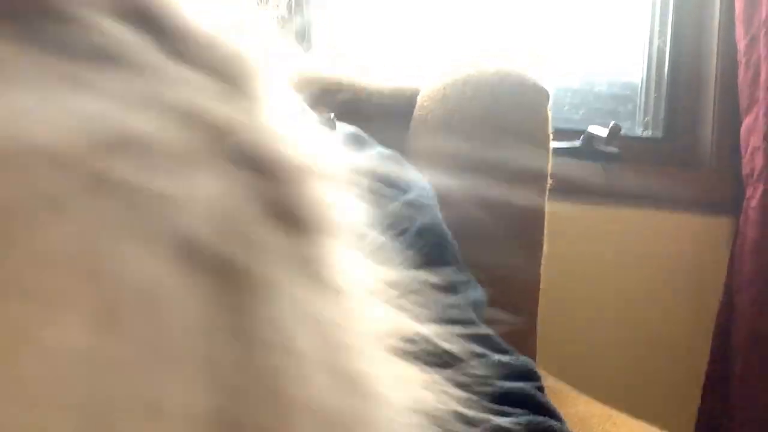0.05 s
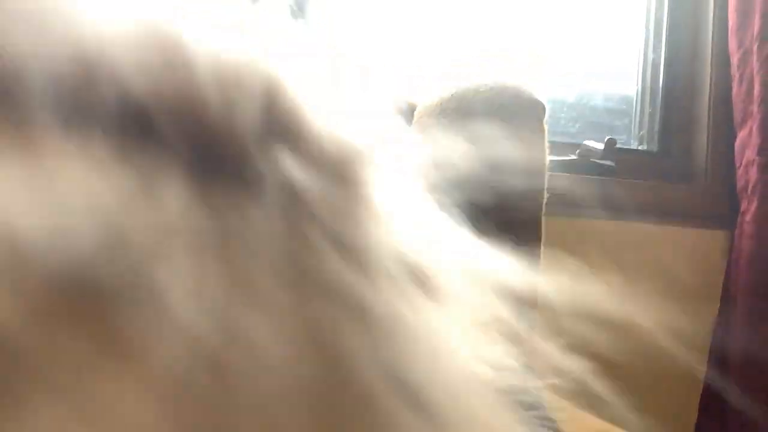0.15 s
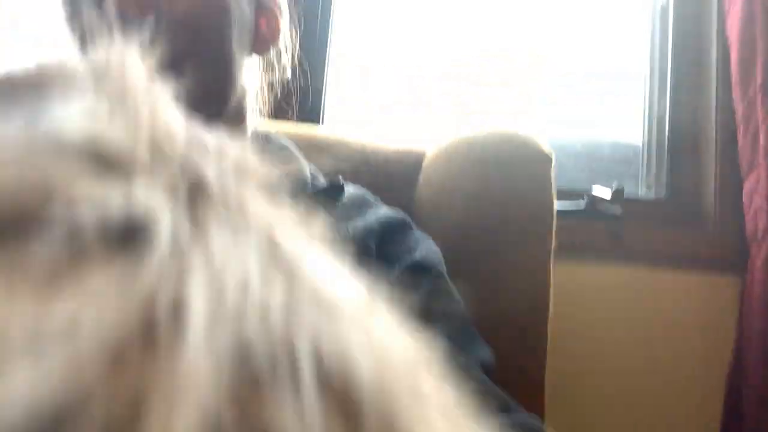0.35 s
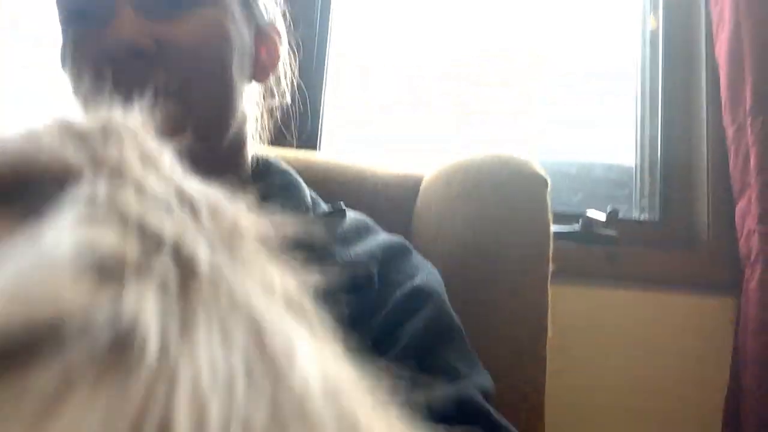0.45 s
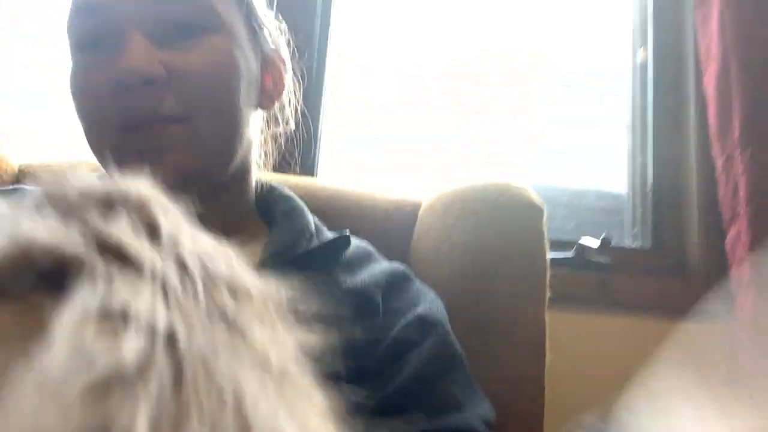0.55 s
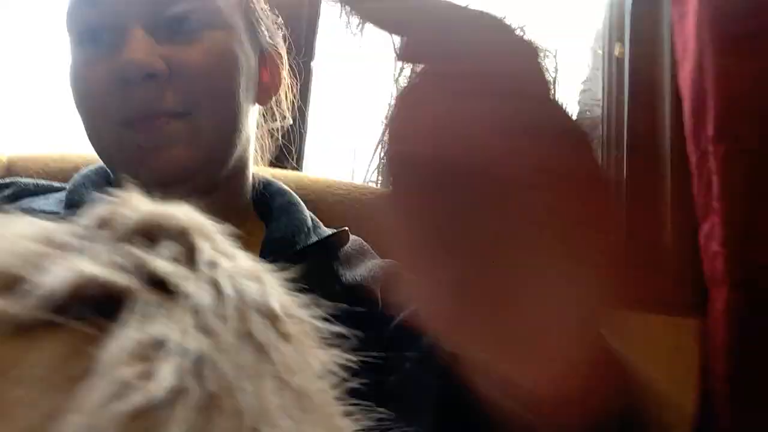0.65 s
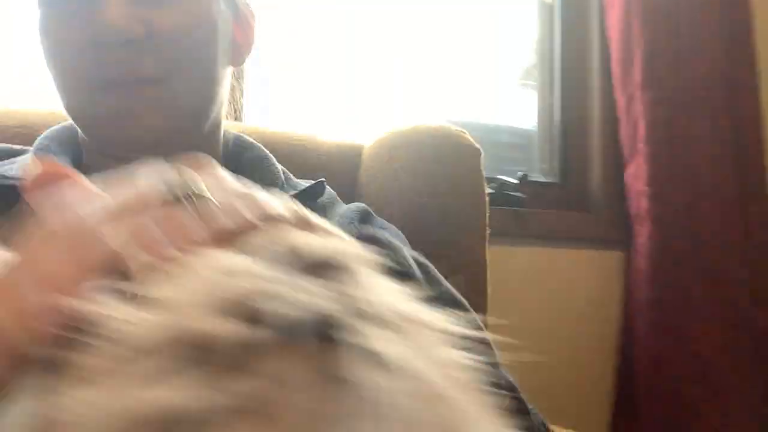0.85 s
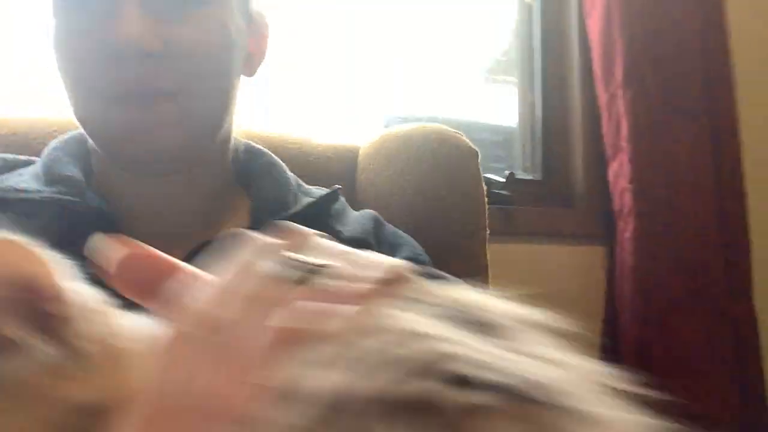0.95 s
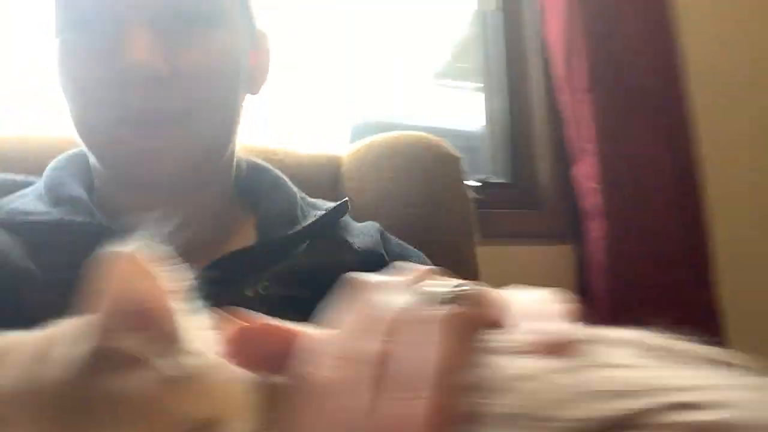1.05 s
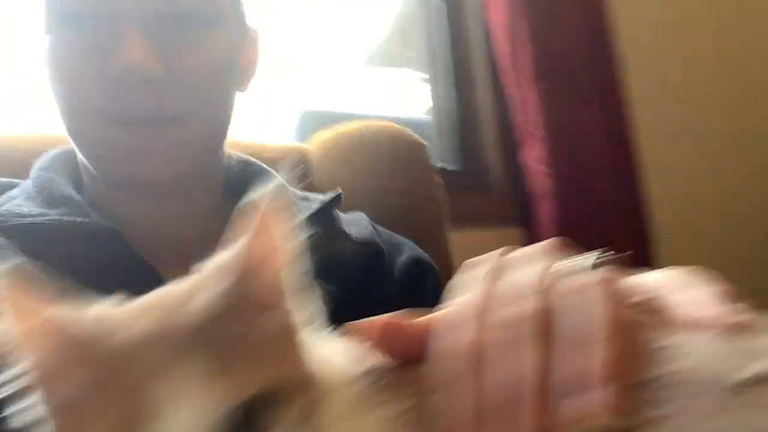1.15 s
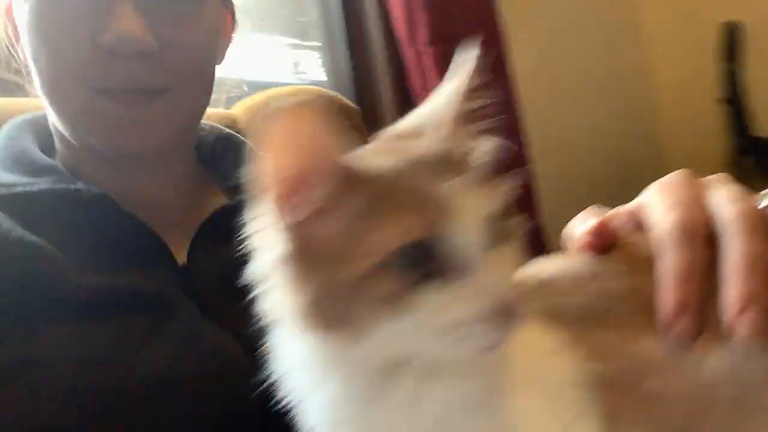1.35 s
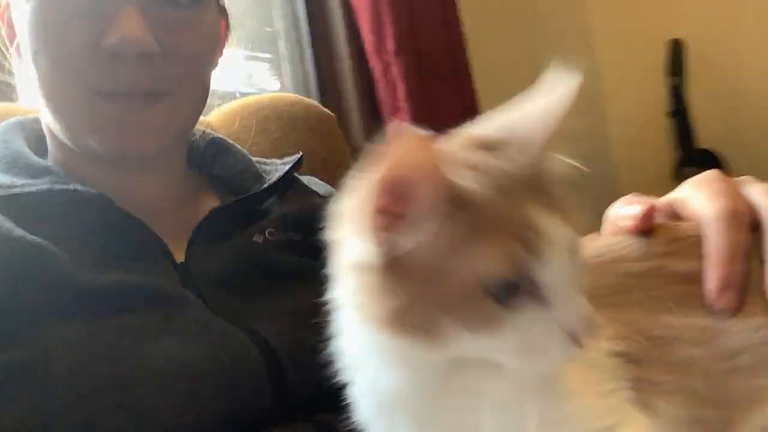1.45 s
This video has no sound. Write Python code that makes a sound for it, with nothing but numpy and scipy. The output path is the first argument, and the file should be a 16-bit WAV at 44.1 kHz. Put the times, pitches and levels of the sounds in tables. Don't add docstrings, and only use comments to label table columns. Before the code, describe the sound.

Close, scratchy fur rustling with small bumps and a sharp tick, over a kitten's low purr

```python
import sys
import numpy as np
from scipy import signal
from scipy.io import wavfile

SR = 44100
rng = np.random.default_rng(int(sys.argv[2]) if len(sys.argv) > 2 else 0)


def store_pcm(level_fs):
    pcm = np.round(np.clip(level_fs, -1, 1) * 32767).astype(np.int16)
    wavfile.write(sys.argv[1], SR, np.atleast_2d(pcm).T)


def makeup_ratio(level_db):
    decades = np.asarray(level_db, float) / 20
    return 10 ** decades


N = 66150

# freq_hz, density_db
HISS_COLOUR = [(300, 9), (1000, 2.5), (3000, -3.5), (6000, -2.5), (7200, 4.5), (9000, -3.5), (15900, -7.5)]
# time_s, friction_db, casing_weight_db, hair_speed_db
HAND_STROKE = [(0.0, -65.5, -5.5, -12), (0.08, -65, -6, -38), (0.13, -60.5, -6, -26),
               (0.196, -67.5, -5.5, -38), (0.214, -49, 1.5, -31), (0.235, -49.5, 5, -17.5),
               (0.283, -60, 4.5, -19), (0.307, -59.5, 6.5, -68), (0.315, -46.5, -1.5, -28),
               (0.364, -48.5, 3.5, -18), (0.41, -51, -3, -7), (0.44, -48, -1, -24), (0.468, -56, 0, -18),
               (0.506, -50.5, -5.5, -20.5), (0.62, -48.5, -10.5, -23), (0.7, -53.5, -6, -16),
               (0.76, -57, -1, -21), (0.83, -79.5, -4, -31)]
# freq_hz, density_db
FUR_COLOUR = [(300, -11.5), (700, 0.5), (1600, -6), (5000, -3.5), (6800, 1), (8500, -8), (11000, -23.5),
              (15500, -44.5)]
# first_beat_s, last_beat_s, period_s
PURR_PHRASES = [(0.017, 0.18, .0391), (0.212, 0.79, .0400), (0.8155, 0.9, .0390), (0.9318, 1.13, .0385),
                (1.1625, 1.17, .0390), (1.2045, 1.25, .0415), (1.2868, 1.5, .0405)]
# level_db, lead_pulse_db, chest_db
PHRASE_LEVELS = [(-55, -11, 2.5), (-56.5, -16, 1), (-58, -3, 1.5), (-52, -5, -1.5), (-61, 4, 6.5),
                 (-46.5, -7, -5), (-51.5, -2, .5)]
# freq_hz, level_db, t60_s
THROAT_MODES = [(560, -2, 0.028), (670, -9.5, 0.03)]
# freq_hz, level_db, t60_s
CHEST_MODES = [(204, -1, 0.09), (245, -5.0, 0.057)]
# start_s, peak_db, pitch_hz, t60_s
SOFT_KNOCKS = [(0.227, -44, 470, 0.09), (0.240, -37, 560, 0.09), (0.264, -39.5, 303, 0.065),
               (0.29, -22.5, 207, 0.013), (0.307, -30.5, 140.3, .09), (0.309, -30, 70.8, 0.12),
               (0.342, -32.5, 880, .015), (0.369, -34, 877, 0.022), (0.440, -34, 647, .025),
               (0.448, -42, 195, 0.064)]
# start_s, peak_db
NAIL_TICKS = [
    (0.3097, -16.5),
    (0.370, -32),
    (0.753, -43),
    (1.017, -64),
]
# freq_hz, level_db, t60_s, lag_s
CASING_MODES = [(1270, -8.5, .012, 0.00137), (2460, -5.5, 0.0077, 0.00046), (3540, -5, 0.0025, 0.000033),
                (4920, 0, 0.0014, 0.000069), (7000, -3.5, 0.0038, 0.00012), (1900, -5, 0.0046, 0.0011)]
# time_s, pitch_hz, level_db
WHISTLE_GLIDE = [(0.7, 7603, -100), (0.8, 7750, -78), (0.9, 7470, -86.5), (1.01, 7500, -78),
                 (1.05, 7450, -101), (1.1, 7310, -81), (1.5, 7400, -79.5)]


def rms_one(x):
    return x / np.sqrt(np.mean(x ** 2) + 1e-20)


def in_time(rows):
    time_s, *columns = np.transpose(rows)
    return [np.interp(np.arange(N) / SR, time_s, c) for c in columns]


def band(x, low_hz, high_hz, order=2):
    return signal.sosfilt(signal.butter(order, [low_hz, high_hz], "band", fs=SR, output="sos"), x)


def noise_band(low_hz, high_hz):
    return rms_one(band(rng.standard_normal(N), low_hz, high_hz))


def drift(rate_hz):
    r = np.exp(-20 * np.pi * rate_hz / SR)
    slow = signal.lfilter([1], [1, -2 * r, r * r], rng.standard_normal(N // 10 + 2002))[2000:]
    return np.interp(np.arange(N) / 10, np.arange(len(slow)), rms_one(slow))


def ring(clicks, freq_hz, t60_s):
    r = makeup_ratio(-60 / (t60_s * SR))
    w = 2 * np.pi * freq_hz / SR
    return signal.lfilter([0, np.sin(w)], [1, -2 * r * np.cos(w), r * r], clicks + 1e-18)


def clicks_at(start_s, gain):
    out = np.zeros(N + SR)
    np.add.at(out, (np.asarray(start_s) * SR).astype(int), gain)
    return out[:N]


def coloured(sources, spectrum, change_db):
    freq_hz, density_db = np.transpose(spectrum)
    edges_hz = 280 * 2 ** np.arange(0, 6.1, 1 / 5)
    mids_hz = np.sqrt(edges_hz[1:] * edges_hz[:-1])
    level_db = np.interp(np.log(mids_hz), np.log(freq_hz), density_db)
    out = 0
    for k, mid_hz in enumerate(mids_hz):
        gain = makeup_ratio(level_db[k] + change_db(mid_hz))
        out = out + gain * band(sources[k % 2], edges_hz[k], edges_hz[k + 1])
    return out


def room():
    hiss_db, hum_db, hum_lumps_db = -81, -71, 2
    hiss = coloured(rng.standard_normal((2, N)), HISS_COLOUR, lambda hz: 0.5 * drift(15))
    hum = noise_band(55, 150) * makeup_ratio(hum_db + hum_lumps_db * drift(30))
    return makeup_ratio(hiss_db) * hiss / band(hiss, 620, 5100).std() + hum


def fur():
    hairs_per_s, hair_spread_db, snap_share = 5400, 2, 0.19
    weight_rest_db, weight_below_hz, weight_octaves = -8, 5540, 1.58
    speed_rest_db, speed_above_hz, speed_octaves = -21, 8000, 0.26
    patchy_db, trim_db = 1.8, -3.01
    port_hz, port_width_hz, port_db = 7000, 900, -3
    rumble_db, rumble_per_weight, rumble_lumps_db = 1.5, 0.96, 5

    level_db, weight_db, speed_db = in_time(HAND_STROKE)
    after_s = np.clip(np.arange(N) / SR - HAND_STROKE[-1][0], 0, 1)
    level_db = level_db - 200 * after_s

    snap_db = hair_spread_db * np.minimum(rng.exponential(1, N), 5)
    snaps = (rng.random(N) < hairs_per_s / SR) * makeup_ratio(snap_db) * rng.choice([-1, 1], N)
    hiss = rng.standard_normal((2, N))
    sources = np.sqrt(snap_share) * rms_one(snaps) + np.sqrt(1 - snap_share) * hiss
    together = drift(36)

    def stroke_db(hz):
        low = np.clip(np.log2(weight_below_hz / hz) / weight_octaves, 0, 1.2)
        high = np.clip(np.log2(hz / speed_above_hz) / speed_octaves, 0, 1.4)
        patches_db = patchy_db * (0.32 * together + drift(7.3))
        return low * (weight_db - weight_rest_db) + high * (speed_db - speed_rest_db) + patches_db

    plain = band(coloured(sources, FUR_COLOUR, lambda hz: 0), 3000, 9000)
    rustle = coloured(sources, FUR_COLOUR, stroke_db)
    port = band(rustle, port_hz - port_width_hz / 2, port_hz + port_width_hz / 2, order=1)
    rustle = rustle + makeup_ratio(port_db) * port
    lumps_db = rumble_lumps_db * drift(9.8)
    rumble = noise_band(89, 341) * makeup_ratio(rumble_db + rumble_per_weight * weight_db + lumps_db)
    return makeup_ratio(level_db + trim_db) * (rustle / plain.std() + rumble)


def purr():
    lead_s, lead_growth, usual_period_s = 0.0113, 0.9, 0.039
    jitter_s, spread_db = 0.0004, 1.37
    chest_lag_s, chest_lead_db, breath_db = 0.003094, -0.56, -17

    beats = []
    for (first_s, last_s, period_s), levels in zip(PURR_PHRASES, PHRASE_LEVELS):
        gap_s = lead_s + lead_growth * (period_s - usual_period_s)
        beats += [(s, gap_s, *levels) for s in np.arange(first_s, last_s, period_s)]
    main_s, gap_s, level_db, lead_db, chest_db = np.array(beats).T

    pulse_s = np.r_[main_s, main_s - gap_s]
    pulse_s = pulse_s + jitter_s * rng.standard_normal(len(pulse_s))
    pulse_db = np.r_[level_db, level_db] + spread_db * rng.standard_normal(len(pulse_s))
    quick = clicks_at(pulse_s, -makeup_ratio(pulse_db + np.r_[0 * level_db, lead_db]))
    slow_db = pulse_db + np.r_[chest_db, chest_db + chest_lead_db]
    slow = clicks_at(pulse_s + chest_lag_s, makeup_ratio(slow_db))

    flutter = ring(slow, 18, 0.03) * rng.standard_normal(N) * makeup_ratio(breath_db - 21.5)
    throat = sum(makeup_ratio(db) * ring(quick + flutter, hz, t60_s) for hz, db, t60_s in THROAT_MODES)
    chest = sum(makeup_ratio(db) * ring(slow + flutter, hz, t60_s) for hz, db, t60_s in CHEST_MODES)
    return band(throat + chest, 101, 763, order=4)


def casing():
    soft = np.zeros(N)
    for start_s, peak_db, pitch_hz, t60_s in SOFT_KNOCKS:
        knock = ring(clicks_at([start_s], makeup_ratio(peak_db)), pitch_hz, t60_s)
        soft += band(knock, pitch_hz * 0.67, pitch_hz * 1.6, order=1)
    tick_s, tick_db = np.transpose(NAIL_TICKS)
    bright = np.zeros(N)
    for k, (freq_hz, level_db, t60_s, lag_s) in enumerate(CASING_MODES):
        sign = (-1) ** k
        bright += sign * makeup_ratio(level_db) * ring(clicks_at(tick_s + lag_s, makeup_ratio(tick_db)), freq_hz, t60_s)
    return soft + band(bright, 800, 9000, order=3)


def whistle():
    throb_hz, throb_start_s, throb_db, sag_hz = 29.9, 0.011, 8, 45
    width_hz, pure_share = 120, 1.2
    pitch_hz, level_db = in_time(WHISTLE_GLIDE)
    beat = 2 * np.pi * throb_hz * (np.arange(N) / SR - throb_start_s) + 0.2 * drift(4)
    phase = 2 * np.pi * np.cumsum(pitch_hz - sag_hz * np.sin(beat)) / SR
    throb = np.clip(2.5 * np.cos(beat) + 1.2, -1.2, 0.3)
    tone = (pure_share + drift(width_hz)) * np.cos(phase) + drift(width_hz) * np.sin(phase)
    return makeup_ratio(level_db + throb_db * throb) * tone


def brush():
    start_s, level_db, rise_s, fall_s = 1.002, -68, 0.009, 0.022
    t = np.arange(N) / SR - start_s
    shape = np.exp(np.where(t < 0, t / rise_s, -t / fall_s))
    return makeup_ratio(level_db) * shape * noise_band(596, 1810)


def scene():
    return (room() + fur() + purr() + casing() + whistle() + brush())[None]


def roll_off(x):
    return signal.sosfilt(signal.butter(12, 15980, fs=SR, output="sos"), x)


def record(dry):
    low_cut_hz, top_cut_hz = 61, 16650
    x = signal.sosfilt(signal.butter(7, low_cut_hz, "high", fs=SR, output="sos"), dry)
    x = signal.sosfilt(signal.cheby2(12, 70, top_cut_hz, fs=SR, output="sos"), x)
    return roll_off(x)


dry = scene()
out = record(dry)
store_pcm(out)
```